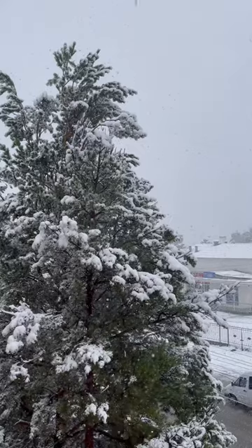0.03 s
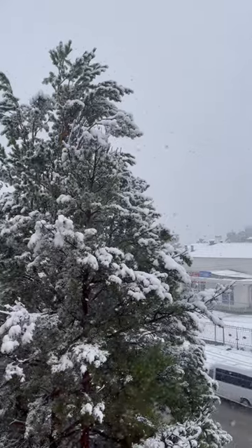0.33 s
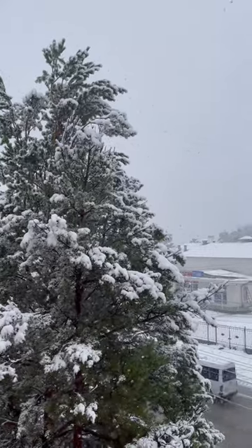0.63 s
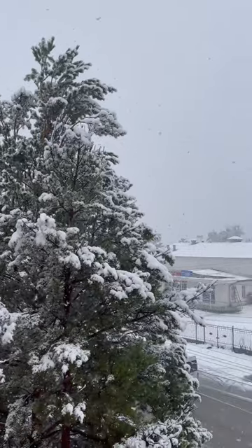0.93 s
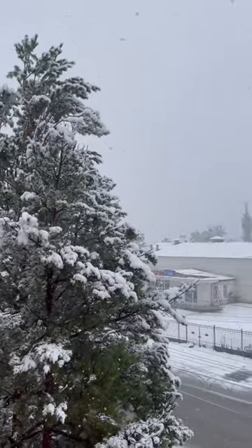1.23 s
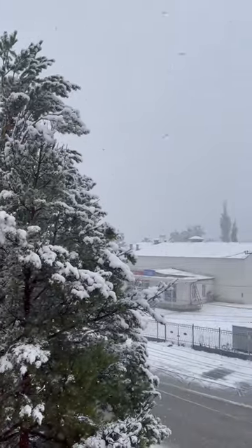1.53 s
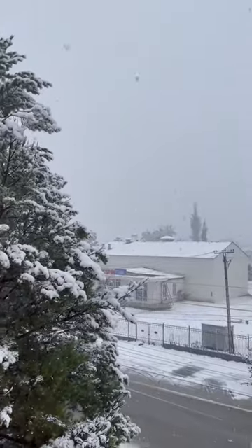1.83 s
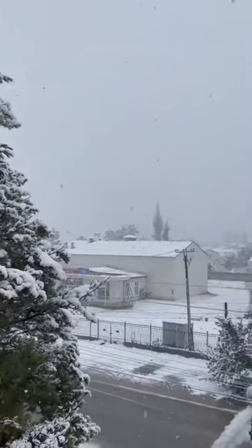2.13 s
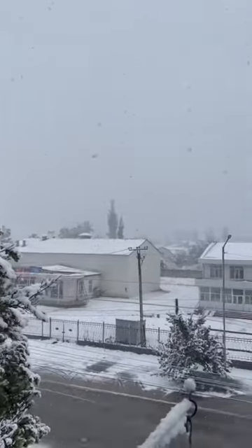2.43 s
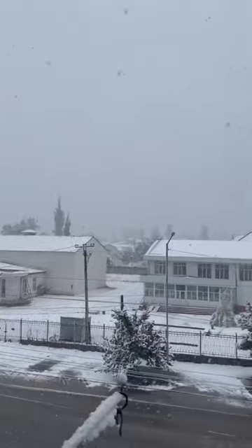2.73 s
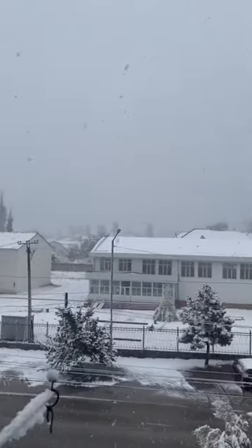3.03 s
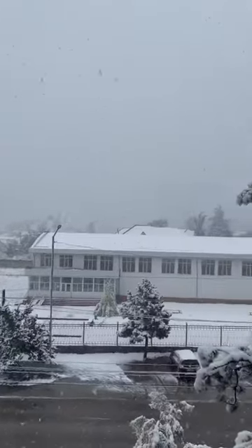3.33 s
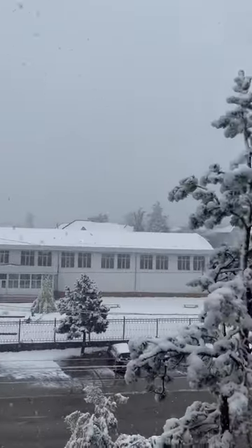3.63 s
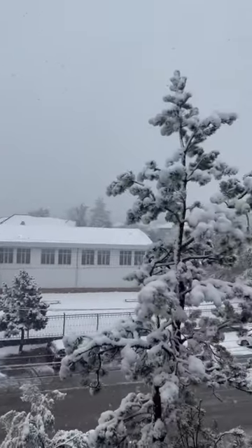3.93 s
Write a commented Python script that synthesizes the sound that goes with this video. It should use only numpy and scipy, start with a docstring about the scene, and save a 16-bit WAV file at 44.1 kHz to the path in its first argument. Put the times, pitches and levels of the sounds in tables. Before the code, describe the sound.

A minibus drives away on a wet street, heard from above. Its tyre roar, fine spray and low exhaust drone are loudest in the first second. The tyres swish through slush around 1.5 seconds, and the vehicle fades by about 3 seconds, leaving a steady wash and rumble of distant traffic. Faint ticks and soft microphone bumps come near 0.5 seconds and again between 3 and 4 seconds.

```python
"""Minibus leaving on a slushy street

Heard from an upper floor in falling snow, a minibus drives away. Its tyres roar on wet asphalt,
throw off spray and swish through slush while the exhaust drones, all fading into the wash and
rumble of distant traffic. Faint ticks and soft handling bumps reach two close-set microphone ports."""
import sys
import numpy as np
from scipy import signal
from scipy.fft import rfft, irfft, next_fast_len
from scipy.io import wavfile
from scipy.ndimage import uniform_filter1d, map_coordinates

SR = 44100
rng = np.random.default_rng(int(sys.argv[2]) if len(sys.argv) > 2 else 0)


def wav_record(signal):
    """Record a signal, one row per channel, as 16-bit PCM in the file named by sys.argv[1]."""
    frames = np.transpose(np.atleast_2d(signal))
    bounded = np.clip(frames, -1, 1)
    # unit amplitude maps onto the largest positive 16-bit level
    quanta = np.round(bounded * 32767).astype(np.int16)
    wavfile.write(sys.argv[1], SR, quanta)


N = 176400
TIME_S = np.arange(N) / SR


def amp(db):
    """Decibels to gain."""
    return 10 ** (np.asarray(db) / 20)


def unit(x):
    """Scale to rms 1."""
    return x / np.sqrt(np.mean(x ** 2) + 1e-20)


def along(points, hz):
    """Read (freq_hz, value) breakpoints on a log frequency axis."""
    freqs, values = np.transpose(points)
    return np.interp(np.log(hz + 1), np.log(freqs + 1), values)


def curve(rows):
    """An envelope through (time_s, value) breakpoints."""
    return np.interp(TIME_S, *np.transpose(rows))


def wobble(rate_hz):
    """Smooth random modulation with rate_hz knots a second."""
    return map_coordinates(rng.standard_normal(400), [TIME_S * rate_hz], mode="wrap")


def filtered(x, response):
    """Apply an EQ given as a complex function of frequency."""
    size = next_fast_len(N + SR // 2)
    return irfft(rfft(x, size) * response(np.fft.rfftfreq(size, 1 / SR)), size)[..., :N]


def spread(pair, spectrum):
    """Blend two unrelated signals into one coloured stereo sound of rms 1, its sides partly alike."""
    # likeness of left and right: freq_hz, coherence
    alike = [(70, 1), (150, .995), (300, .95), (600, .82), (1000, .91), (1750, .96), (2200, .77),
             (2700, .33), (3500, .7), (4300, .55), (5000, .8), (6000, .99), (7500, .84), (8500, .995),
             (9300, 1), (10000, .87), (11200, .8), (12000, .995)]

    def mid_side_eq(hz):
        width = np.arccos(np.clip(along(alike, hz), -1, 1)) / 2
        return amp(along(spectrum, hz)) * [np.cos(width), np.sin(width)]

    mid, side = filtered(pair, mid_side_eq)
    return unit(np.array([mid + side, mid - side]))


def rush(spectrum, patchy_db):
    """Coloured stereo noise whose level flickers in patches of time and frequency."""
    bins = signal.stft(rng.standard_normal((2, N)), nperseg=1024)[2]
    patches = uniform_filter1d(rng.standard_normal(bins.shape[1:]), size=6, axis=0)
    patches = unit(uniform_filter1d(patches, size=12, axis=1))
    noise = signal.istft(bins * amp(patchy_db * patches), nperseg=1024)[1]
    return spread(noise[:, :N], spectrum)


def tyres():
    """Tread roars on wet asphalt and recedes; the low body carries further than the hiss."""
    # fade of the roar: time_s, level_db
    fade = [(0, -38.5), (.15, -36.5), (.33, -36.5), (.6, -38.7), (.85, -38.5), (1.2, -40), (1.6, -41),
            (2.0, -44.5), (2.6, -48), (3.3, -59.5), (4, -67)]
    # colour of the roar: freq_hz, relative_db
    colour = [(30, -12), (70, 5.5), (130, 7), (180, -0.5), (225, 3), (300, 1), (450, 2), (650, -6),
              (850, -1), (1100, 0), (1450, -2.5), (1800, 5), (2200, 1), (2900, -2.5), (4000, -6.5),
              (6000, -9), (12000, -66)]
    body_hz, body_start_db, carry_db_per_s = 520, -3.5, 2.5
    roar = rush(colour, patchy_db=1.6)
    body = filtered(roar, lambda hz: 1 / (1 + (hz / body_hz) ** 6))
    hiss = roar - body
    carry = amp(body_start_db + carry_db_per_s * TIME_S)
    return amp(curve(fade) + 0.3 * wobble(18)) * (hiss + carry * body)


def spray():
    """Water flies off the tread as fine hiss and spattering droplets, duller with distance."""
    # the spray sinks away, then lifts at the end: time_s, level_db
    envelope = [(0, -41.3), (.42, -44), (.8, -46.5), (1.3, -47.5), (1.6, -47), (1.85, -49.7), (2.1, -56),
                (2.7, -64), (4, -48.5)]
    # colour of the water: freq_hz, relative_db
    colour = [(500, -40), (2500, -7), (3700, -7), (5000, -1.5), (6200, -2), (7500, -1), (9500, -5.5),
              (11000, 1), (12200, -20.5)]
    drops_per_s, spatter_db, scatter_db = 1200, -4, 3.5
    treble_hz, dulling_db_per_s = 6000, 3.5
    hits = rng.random(N) < drops_per_s / SR
    drops = hits * amp(scatter_db * np.clip(rng.standard_normal(N), -2, 2))
    spatter = spread(drops * rng.standard_normal((2, N)), colour)
    water = rush(colour, patchy_db=2.0) + amp(spatter_db) * spatter
    body = filtered(water, lambda hz: 1 / (1 + (hz / treble_hz) ** 4))
    treble = amp(-dulling_db_per_s * TIME_S) * (water - body)
    return amp(curve(envelope) + 1.05 * wobble(22.3)) * (body + treble)


def exhaust():
    """The engine's firing note swells and sinks over a fading rough chug and upper hum."""
    # swells of the firing note: time_s, level_db
    note_level = [(0, -30), (.17, -47), (.3, -39), (.48, -38.5), (.57, -41), (.7, -44), (.87, -49),
                  (1.15, -49), (1.22, -41.5), (1.43, -40.5), (1.72, -49.5), (1.87, -39), (1.96, -49),
                  (4, -79)]
    # fade of the chug and hum: time_s, level_db
    chug_level = [(0, -36), (.18, -42.5), (.3, -42), (.42, -48.5), (.62, -48), (.8, -50), (1.05, -50),
                  (1.25, -52.5), (2, -55.5), (4, -74)]
    # colour of the rough exhaust noise: freq_hz, relative_db
    chug_colour = [(20, -23), (50, -17), (76, 5.5), (100, -10), (135, -0.5), (180, -28), (225, -3),
                   (280, -15.5), (325, -6), (420, -30), (600, -54), (2000, -80)]
    firing_hz, speed_drift = 56.15, 0.012
    hum_hz, hum_db = 219.7, -10.5  # level relative to the chug
    phase_per_hz = 2 * np.pi * np.cumsum(1 + speed_drift * wobble(12)) / SR
    note = amp(curve(note_level) + wobble(22.1)) * unit(np.sin(firing_hz * phase_per_hz))
    hum = amp(hum_db + 3.1 * wobble(7.5)) * unit(np.sin(hum_hz * phase_per_hz))
    chug = rush(chug_colour, patchy_db=0.5)
    return note + amp(curve(chug_level)) * (chug + hum)


def traffic():
    """Far streets lay a bed of tyre wash and low rumble, with one engine drawing nearer."""
    # near-steady wash of far tyres: time_s, level_db
    wash_level = [(0, -39.5), (2.2, -42), (2.6, -41), (2.95, -40), (3.2, -41), (3.6, -40), (4, -42)]
    # colour of the wash: freq_hz, relative_db
    wash_colour = [(100, -1.5), (200, -3.5), (450, -2.5), (680, -5.5), (850, -3.5), (1000, -0.9), (1350, 2),
                   (1700, -0.6), (2150, -5), (2550, -0.8), (3000, -6.5), (4000, -10.5), (5000, -13),
                   (6200, -17), (8000, -17.5), (11000, -15.5), (12200, -40)]
    # slow heave of the rumble: time_s, level_db
    rumble_level = [(0, -47), (1.1, -42.5), (1.3, -49.5), (1.8, -48), (2.15, -44.5), (2.7, -48.5),
                    (3.3, -46), (3.7, -42.5), (4, -46.5)]
    # colour of the rumble: freq_hz, relative_db
    rumble_colour = [(15, -21), (30, -19), (45, 1.5), (70, 4.5), (100, 0), (150, -7.5), (220, -10),
                     (400, -37), (1500, -70)]
    # late swell of the far engine: time_s, level_db
    engine_level = [(0, -58), (2.9, -64), (3.6, -55.5), (4, -52)]
    # colour of its drone: freq_hz, relative_db
    engine_colour = [(60, -23), (120, -8), (160, -1.5), (205, 3), (300, -8.5), (800, -50)]
    wash = amp(curve(wash_level) + 0.032 * wobble(7.4)) * rush(wash_colour, patchy_db=1.5)
    rumble = amp(curve(rumble_level) + 0.43 * wobble(12)) * rush(rumble_colour, patchy_db=0.8)
    engine = amp(curve(engine_level)) * rush(engine_colour, patchy_db=-2.5)
    return wash + rumble + engine


def ticks():
    """Small ticks, splashes and scuffs: bands of noise that start sharply and die away."""
    # noise bursts: start_s, level_db, centre_hz, half_width_hz, t60_s
    bursts = [(0.4181, -29.5, 6000, 5000, 0.0068), (1.228, -38, 1900, 400, 0.14),
              (2.381, -40, 10500, 1400, 0.0088), (2.9448, -30.5, 9700, 1500, 0.0033),
              (3.813, -41.5, 480, 420, 0.27)]
    out = np.zeros(N)
    for start_s, level_db, centre_hz, half_width_hz, t60_s in bursts:
        age = TIME_S - start_s
        noise = rng.standard_normal(N)
        band = unit(filtered(noise, lambda hz: 1 / (1 + ((hz - centre_hz) / half_width_hz) ** 2)))
        out += amp(level_db - 60 * np.abs(age) / t60_s) * (age >= 0) * band
    return out


def bumps():
    """A hand knocks soft, low thuds from the microphone's housing, the last wrapped in a short rub."""
    # handling thuds: start_s, level_db, pitch_hz
    thuds = [(0.601, -33.5, 75), (1.085, -42.5, 83.4), (2.969, -37, 73.5), (3.105, -36.5, 78.5),
             (3.486, -36.5, 73), (3.837, -29.5, 72)]
    # rub around the last thud: time_s, level_db
    rub_level = [(3.78, -79), (3.825, -39), (3.85, -49), (3.9, -47), (4, -51.5)]
    # colour of the rub: freq_hz, relative_db
    rub_colour = [(30, -16), (65, 6), (150, -4), (220, -16), (400, -23), (700, -9), (1500, -51)]
    rise_s, t60_s = 0.0054, 0.17
    overtone_ratio, overtone_db = 2.33, -10.5
    out = amp(curve(rub_level)) * rush(rub_colour, patchy_db=-2.0)
    for start_s, level_db, pitch_hz in thuds:
        age = np.maximum(TIME_S - start_s, 0)
        envelope = (1 - np.exp(-age / rise_s)) * amp(-60 * age / t60_s)
        phase = 2 * np.pi * pitch_hz * age
        ring = np.sin(phase) + amp(overtone_db) * np.sin(overtone_ratio * phase)
        out += amp(level_db) * envelope / envelope.max() * ring
    return out


def slush():
    """The tyres swish through slush for a moment as the minibus recedes."""
    # swell of the swish: time_s, level_db
    swell = [(0, -70), (.8, -58), (1.3, -51), (1.6, -48.5), (1.9, -54.5), (2.15, -68), (4, -80)]
    # colour of the swish: freq_hz, relative_db
    colour = [(2000, -32), (3000, 2), (3650, 2), (4300, -3.5), (5200, -13), (8000, -45)]
    return amp(curve(swell) + 0.9 * wobble(18)) * rush(colour, patchy_db=1.5)


def scene():
    """Mix the minibus, the far streets and the small noises in stereo."""
    return tyres() + spray() + slush() + traffic() + exhaust() + bumps() + ticks()


def record(dry):
    """Left and right differ in phase and level, opposing near 9 kHz and hollowing the centre."""
    # phase by which the left channel leads: freq_hz, lead_rad
    lead = [(50, 0), (400, -.1), (850, -.3), (1700, .05), (2600, .5), (4000, .65), (4850, 3.1), (5700, 6.1),
            (6250, 6.35), (7200, 7.6), (8000, 8.6), (8600, 9.35), (9500, 9.5), (11000, 11.1), (11800, 12.5)]
    # level between the channels: freq_hz, left_minus_right_db
    balance = [(60, 0), (250, 2), (550, 3.6), (1000, 0), (2500, -.5), (3300, 1), (4100, -2.5), (5500, 1),
               (6200, 0)]
    silence_s, fade_in_s, high_cut_hz = 0.035, 0.002, 12250
    sides = np.array([[.5], [-.5]])  # each channel takes half, in opposite directions
    stereo = filtered(dry, lambda hz: amp(sides * along(balance, hz))
                      * np.exp(1j * sides * along(lead, hz)))
    fade_in = np.clip((TIME_S - silence_s) / fade_in_s, 0, 1)
    return filtered(stereo * fade_in, lambda hz: hz < high_cut_hz)


dry = scene()
out = record(dry)
wav_record(out)
```